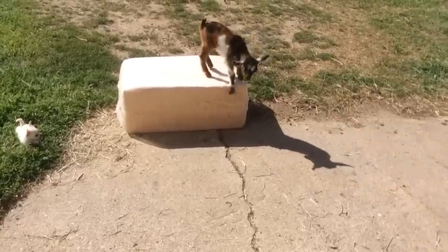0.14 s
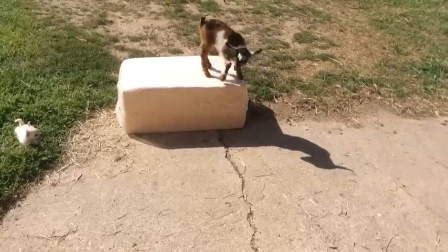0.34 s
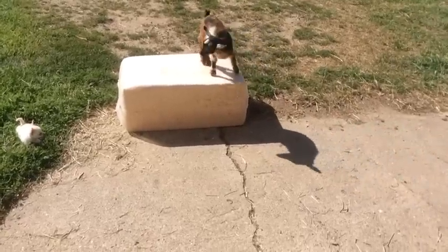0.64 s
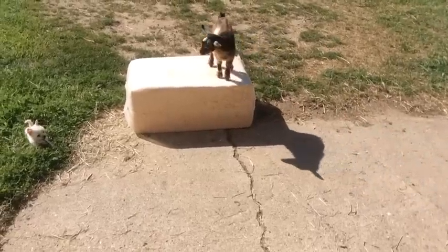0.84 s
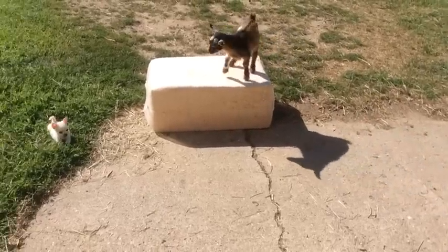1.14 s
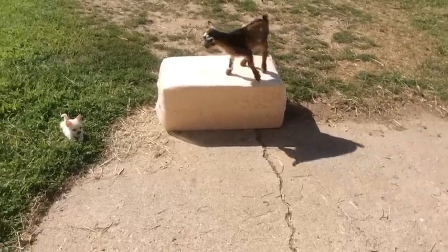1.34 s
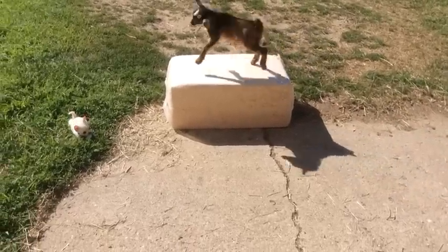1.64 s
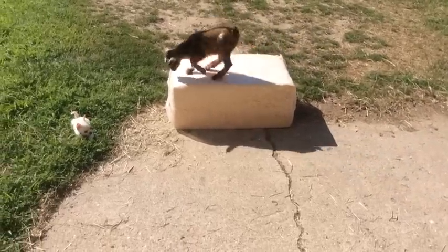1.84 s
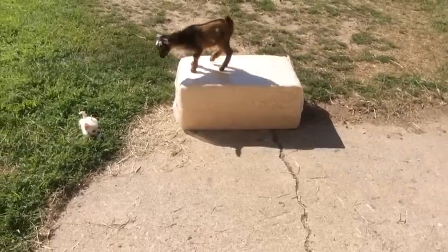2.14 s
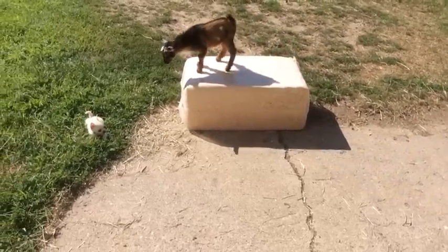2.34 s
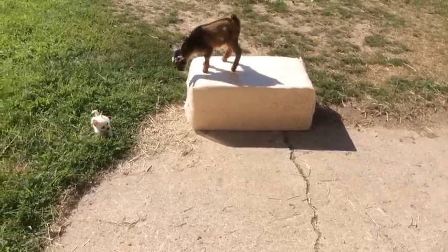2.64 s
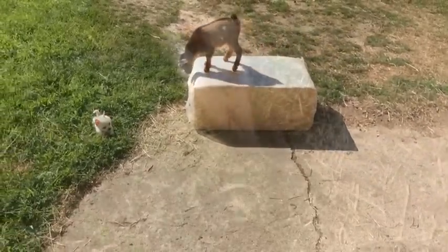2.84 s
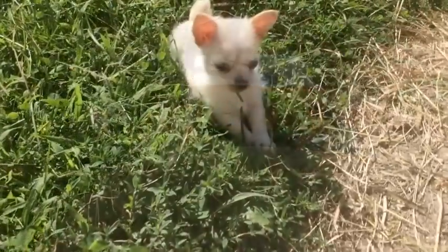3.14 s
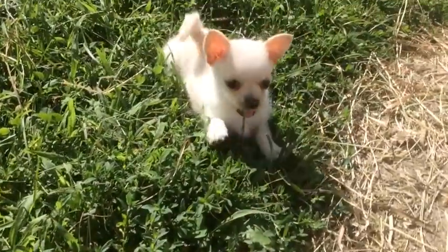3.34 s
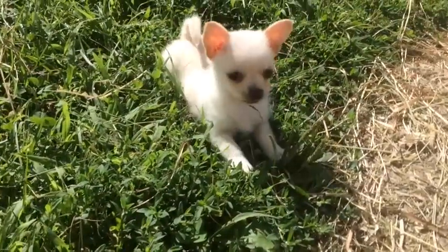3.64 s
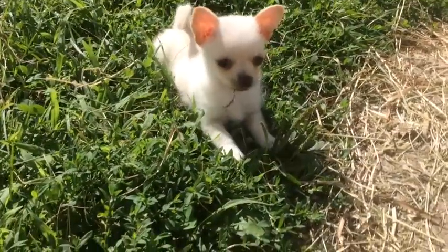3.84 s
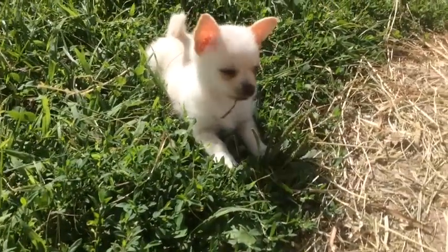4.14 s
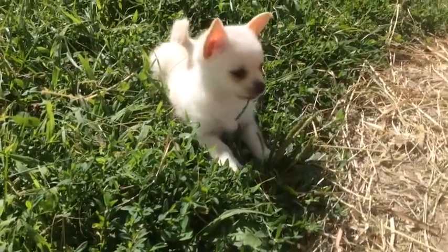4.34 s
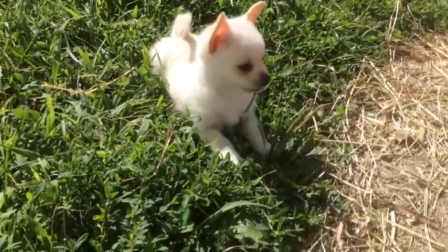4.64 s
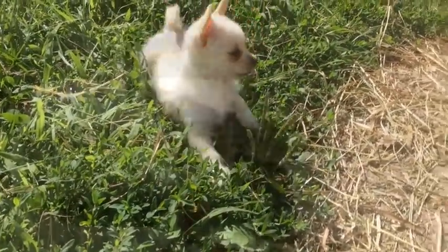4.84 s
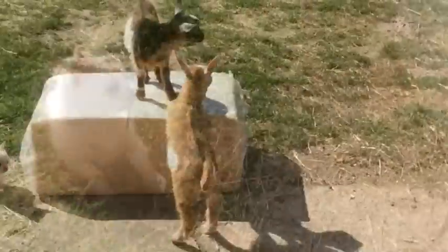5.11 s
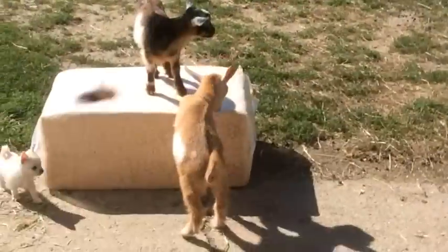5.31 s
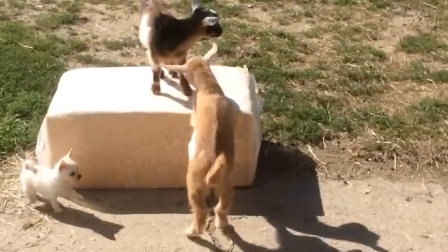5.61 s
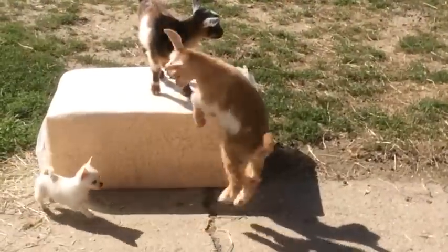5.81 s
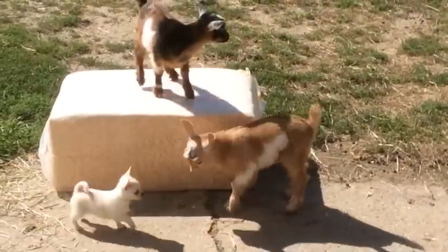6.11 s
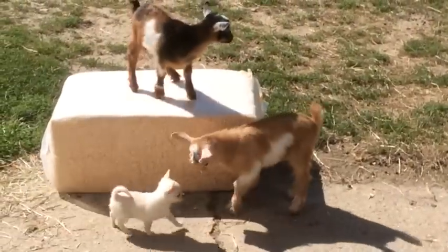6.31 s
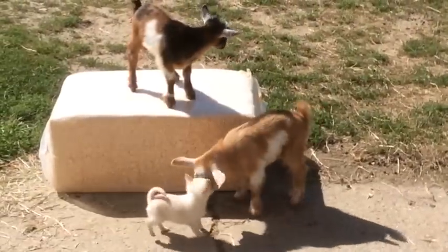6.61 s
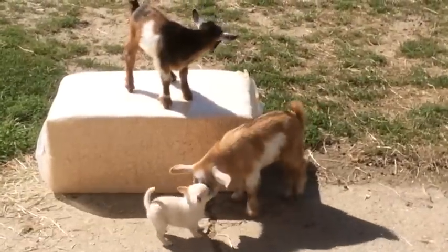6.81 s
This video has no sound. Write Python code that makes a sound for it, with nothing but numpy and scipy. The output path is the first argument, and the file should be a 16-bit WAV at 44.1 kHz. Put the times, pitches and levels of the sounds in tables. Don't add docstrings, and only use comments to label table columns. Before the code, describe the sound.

A small goat gives four stuttering, creaky bleats: a loud one at once, a softer one, a weak fading one, then a loud, falling one. Hooves tap and thud on a plastic-wrapped bale, with a crackly flurry before the last bleat. A far bird peeps early, a near insect chirps late. Open farmyard with breeze and insect hiss, phone microphone.

```python
import sys
import numpy as np
from scipy import signal
from scipy.fft import rfft, irfft, next_fast_len
from scipy.io import wavfile
from scipy.ndimage import uniform_filter1d, map_coordinates

SR = 44100
rng = np.random.default_rng(int(sys.argv[2]) if len(sys.argv) > 2 else 0)


def materialize(psi):
    bounded = np.clip(np.atleast_2d(psi).T, -1, 1)
    quanta = np.round(bounded * 32767).astype(np.int16)
    wavfile.write(sys.argv[1], SR, quanta)


def invert_db(x):
    u = np.asarray(x, float) / 20
    return 10 ** u


N = 307359

# (start [s], length [s], peak effort [dB], fold snaps [Hz], chest [dB])
BLEATS = [
    [(-0.0314, 0.054, -35.5, 216.2, -8), (.0728, 0.061, -32.5, 211.4, -10.5),
     (.1827, 0.052, -33, 203.8, -9), (.2987, .05, -34.5, 196, -7), (.4121, 0.026, -57.5, 197.5, 2.5)],
    [(1.9, 0.019, -45.5, 223.6, -2), (1.9728, 0.051, -38.5, 223.9, -13), (2.0684, 0.054, -40, 217.5, -8),
     (2.1808, 0.052, -40, 203.6, -7), (2.3167, 0.0417, -43.5, 173.7, -4)],
    [(3.4209, 0.038, -63.5, 200.6, 3.5), (3.5193, 0.041, -50.5, 223.7, 0), (3.6054, .06, -46.5, 215, -3),
     (3.7256, 0.0485, -48, 203.8, -4), (3.8302, 0.0551, -48.5, 192.4, 1.5), (3.9319, 0.097, -66.5, 198, 10)],
    [(5.373, 0.012, -46, 224.6, -15), (5.404, .008, -53, 222.5, -9), (5.4617, 0.037, -35, 229.4, -9.5),
     (5.5517, 0.0523, -35, 224.6, -7), (5.657, 0.054, -37.5, 221.1, -6), (5.7758, 0.046, -39.5, 202.8, 0),
     (5.9002, 0.046, -40.5, 186.8, -14), (6.035, 0.042, -68, 192.5, 1)],
]
# (pitch at first syllable [Hz], climb [Hz/s], overtone [dB],
# chest climb [Hz/s], throat climb [dB/s])
MOUTH = [(3743, 780, -9.5, -150, 3), (3466, 1600, -29, 0, 6), (3740, 840, -10, -74, 13),
         (3160, 1080, -22, 222, 16)]
# (chest [Hz], throat (pitch [Hz], level [dB]), nose (same), upper tract (same))
TRACT = [(873, (1840, -9), (2710, -13.5), (4800, -9)), (851, (1790, -15), (2620, -23), (4990, -8.5)),
         (860, (1650, -18.5), (2640, -2), (5200, 0.5)), (839, (1845, -8), (2200, -14), (7500, -40))]
# (upward glide [Hz], time shut [s], delay of the echo off the ground [s], level of that
# echo [dB])
FOLDS = [(230, 0.0067, 0.0023, -3), (200, 0.008, 0.001821, 4), (150, .0037, 0.0017, 5),
         (570, 0.0032, 0.00119, -14)]
# (breath [dB], low voice [dB], pitch sag [share], pitch scoop at start [share])
AIR = [(-19, -28.5, 0.04, -0.014), (-18.5, -23, 0.0033, -0.015), (-4.5, -12, .03, 0.0013),
       (-18, -17.5, .01, .04)]
# (mouth ring time for 60 dB [s], weak creak ahead of each syllable [s])
CREAK = [(.011, 0), (.012, 0), (.010, .025), (.017, 0)]
PEAK_AT = [0.87, 0.998, 0.552, 0.66]
RASP_DB = [-15, -12, -8, -18]
SNAP_DB = [-16.5, -20, -3.5, -24]
# (level [dB], pitch [Hz])
LEAK = [(-65, 4050), (-68, 4000), (-63, 4000), (-67, 3700)]

# (pitch [Hz], level [dB], time for 60 dB [s])
BALE = [(112.5, -4.5, 0.035), (170.7, 0.5, 0.061), (215, -0.5, 0.03)]
# (pitch [Hz], level [dB], time for 60 dB [s])
WRAP = [(420, -3, 0.024), (494, 3, 0.022), (750, -8, 0.028), (1220, -33.5, 0.0081)]
# (time [s], crackle peak [dB], crackle pitch [Hz], thud [dB], slap [dB])
STAMPS = [(1.8187, -47.5, 2600, -45.5, -45), (1.8995, -39, 6040, -36.5, -46.5),
          (1.9534, -46.5, 4420, -44.5, -56), (2.1553, -49, 3460, -47.5, -57),
          (4.7457, -34, 4240, -61.5, -34), (4.751, -29.5, 5500, -71, -34), (4.7602, -27, 4490, -48, -47),
          (4.813, -36, 3000, -39, -41.5), (4.822, -33, 4300, -42, -34), (4.8322, -28, 960, -39, -43),
          (5.0016, -36.5, 2130, -44.5, -38), (5.026, -31.5, 4100, -49.5, -37),
          (5.0908, -38.5, 2150, -42, -43)]
# (time [s], crackle peak [dB], crackle pitch [Hz], slap [dB])
TICKS = [(.6594, -43, 1148, -69), (1.3086, -57.5, 4840, -75.5), (1.9005, -26.5, 1160, -50),
         (4.6935, -62, 1110, -51.5), (4.777, -52, 3580, -59), (4.802, -56, 3000, -53),
         (4.8573, -46.5, 2610, -66.5), (4.882, -54, 2900, -79), (4.938, -47.5, 4700, -50),
         (4.97, -53, 3120, -53), (5.013, -41, 2530, -51), (5.085, -43.5, 3020, -49),
         (5.293, -45.5, 1990, -54), (5.35, -46, 3260, -54.5), (6.084, -54, 9800, -55)]
# (time [s], thud [dB], crackle peak [dB], crackle pitch [Hz])
SHIFTS = [(0.9606, -52, -51, 1220), (2.8983, -61, -69, 4470), (4.136, -54, -44, 1244),
          (4.248, -55.5, -56, 10600), (4.2785, -55, -48, 1060), (4.335, -61, -58.5, 11000),
          (3.983, -54.5, -64, 1000), (4.889, -58, -66, 2600), (5.047, -48, -60, 1000),
          (5.114, -52.5, -62, 2620), (5.163, -55.5, -81, 3150)]
# (time [s], length [s], level [dB])
SCUFF = [
    (6.29, 0.048, -60),
    (6.4, 0.05, -60.5),
]
# (time [s], length [s], level [dB])
RUSTLE = [
    (.64, .1, -65.5),
    (1.585, 0.09, -72),
    (1.825, 0.0222, -55),
    (4.39, 0.143, -70.5),
]

# (time [s], peak level [dB], pitch [Hz])
CHIRPS = [
    (5.3358, -68.5, 9060),
    (5.64, -68.5, 9200),
    (5.905, -63.5, 8970),
    (6.2238, -70, 8740),
    (6.5036, -68.5, 8772),
    (6.8201, -66.5, 8700),
]
# (time [s], peak level [dB], pitch [Hz])
PEEPS = [(0.5681, -60, 4810), (0.6115, -67, 4930), (1.3254, -56, 4720), (1.3636, -53, 4900),
         (1.6013, -55, 4800), (1.6417, -53.5, 4800), (2.4124, -54, 4740), (2.772, -56, 4800),
         (2.8125, -60, 4970), (2.8624, -59, 4730)]

# (pitch [Hz], time for 60 dB [s])
ECHO = [(200, 0.084), (1000, 0.17), (4000, 0.11), (12000, 0.19)]
# (pitch [Hz], level per Hz [dB])
RUMBLE = [(15, -55), (25, -19), (86, -1.5), (124, -3), (196, -4.5), (234, -5.5), (560, -15), (1200, -24),
          (1560, -84), (2640, -120)]
# (pitch [Hz], level per Hz [dB])
RUSH = [(290, -32), (500, -2.5), (617, -3), (888, -7), (981, -6), (1700, -7.5), (4760, -7), (7000, -17.5),
        (9100, -69), (15400, -120)]
# (pitch [Hz], level per Hz [dB])
INSECTS = [(3530, -85), (6000, -17), (6840, -13.5), (7870, -2), (8260, -1.5), (9740, -11), (12200, -12.5),
           (13300, -11), (14700, -12), (15700, -10), (16000, -41)]
# (from [s], rumble [dB], rush [dB], insects [dB])
STRETCHES = [
    (0, -66, -63.5, -69.5),
    (3.0, -66.5, -69, -72),
    (5.05, -69.5, -69, -70.5),
]
# (time [s], level [dB])
LIFT = [(0, 2), (.6, 1), (1.8, -.5), (2.1, 2.5), (2.9, -1.5), (3.4, 1.5), (3.73, 10), (4.05, 2),
        (4.74, 2.5), (5.0, 5), (5.3, 4.5), (5.67, 7), (6.19, 2), (6.97, 0.5)]


def unit(x):
    return x / np.sqrt(np.mean(x ** 2) + 1e-20)


def band(x, lo_hz, hi_hz):
    return signal.sosfilt(signal.butter(2, [lo_hz, hi_hz], "bandpass", fs=SR, output="sos"), x)


def ring(t, hz, t60, rise):
    return np.sin(2 * np.pi * hz * t) * invert_db(-60 * t / t60) * (1 - np.exp(-t / rise))


def add(track, s, x):
    track[round(s * SR):][:len(x)] += x


def wobble(rate):
    knots = rng.standard_normal(int(N * rate / SR) + 4)
    return map_coordinates(knots, [np.arange(N) * rate / SR])


def along(points, hz):
    f, v = np.transpose(points)
    return np.interp(np.log(hz + 1), np.log(f + 1), v)


def curves(rows):
    s, *cols = np.transpose(rows)
    return [np.interp(np.arange(N) / SR, s, c) for c in cols]


def noise(spectrum, patchy_db):
    z = signal.stft(rng.standard_normal(N + 512), nperseg=512)[2]
    patches = uniform_filter1d(rng.standard_normal(z.shape), 6, 0)
    patches = unit(uniform_filter1d(patches, 10, 1))
    x = signal.istft(z * invert_db(patchy_db * patches), nperseg=512)[1]
    size = next_fast_len(N)
    hz = np.fft.rfftfreq(size, 1 / SR)
    return unit(irfft(rfft(x, size) * invert_db(along(spectrum, hz)), size)[:N])


def strokes(rows, fade_s):
    t, rise_s = np.arange(N) / SR, 0.0324
    total = 0
    for s, length, db in rows:
        outside = np.maximum((s - t) / rise_s, (t - s - length) / fade_s)
        total = total + invert_db(db - 60 * np.maximum(outside, 0))
    return total


def syllable(u, peak_at, length, peak_db, pitch, chest_db, sag, scoop):
    early = max(1 - u / peak_at, 0) * min(length / .045, 1)
    late = max(u - peak_at, 0) / (1 - peak_at)
    db = peak_db - 17.5 * early ** 1.62 - 5.5 * late ** 2
    hz = pitch * (1 - sag * (u - .5) - scoop * early ** 3)
    narrow_hz = 890 * early ** 3.6 + 246 * late
    chest_db = chest_db - 35.5 * (u - 0.65) ** 2
    throat_db = -5 * early - 0.34 * (peak_db + 41.5)
    return db, hz, narrow_hz, chest_db, throat_db


def mouth_ring(t, mouth, detune, t60, overtone_db, folds):
    glide, shut, second_delay, second_db = folds
    rising = mouth * detune + glide * (t / 0.003494 - .5)
    sound = ring(t, rising, t60, 0.0001)
    sound -= invert_db(overtone_db) * ring(t, 2.2 * mouth, 0.0096, 0.0048)
    sound += invert_db(second_db) * ring(np.maximum(t - second_delay, 0), rising, 0.0037, 0.000192)
    return sound / (1 + (t / shut) ** 6)


def breath_puff(t, gust, hiss):
    puff = invert_db(-60 * t / .007) * gust
    puff += .8 * ring(t, 9700, .0025, .0001) + .5 * ring(t, 7600, .0025, .0001)
    return puff + 700 * t * invert_db(-60 * t / 0.0107) * hiss


def bleats():
    jitter, shimmer_db, detune = .006, 1.6, .006
    voice, grid = np.zeros(N + SR), np.arange(SR // 40) / SR
    settings = zip(BLEATS, PEAK_AT, MOUTH, TRACT, FOLDS, AIR, RASP_DB, SNAP_DB, CREAK)
    for rows, peak_at, jaw, tract, folds, flow, rasp_db, snap_db, (mouth_t60, creak) in settings:
        mouth_hz, mouth_climb, overtone_db, chest_climb, throat_climb = jaw
        chest_hz, (throat_hz, throat_db), (nose_hz, nose_db), (upper_hz, upper_db) = tract
        breath_db, low_db, sag, scoop = flow
        for start, length, peak_db, hz, fill_db in rows:
            since = start - rows[0][0]
            chest = chest_hz + chest_climb * since
            throat = throat_hz - 160 * since
            air = rng.standard_normal((21, len(grid)))
            puffs, hisses, rasps = band(air, 4810, 10600), band(air, 12900, 14320), band(air, 1640, 5160)
            now = start - creak
            for luck, gust, hiss, rasp in zip(rng.standard_normal((21, 5)), puffs, hisses, rasps):
                if now > start + length + .002:
                    break
                u = np.clip((now - start) / length, 0, 1)
                db, pitch, narrow_hz, chest_db, lag_db = syllable(
                    u, peak_at, length, peak_db, hz, fill_db, sag, scoop)
                db -= 120 * max(start - now, 0)
                t = np.maximum(grid - (now - round(now * SR) / SR), 0)
                mouth = mouth_hz + mouth_climb * since + narrow_hz
                pulse = mouth_ring(t, mouth, 1 + detune * luck[2], mouth_t60, overtone_db, folds)
                pulse -= invert_db(nose_db + luck[3]) * ring(t, nose_hz, .008, .0002)
                pulse += invert_db(upper_db + luck[4]) * ring(t, upper_hz, 0.008, 0.00063)
                throat_gain = invert_db(throat_db + lag_db + throat_climb * since - 0.5)
                pulse += throat_gain * ring(t, throat, 0.016, 0.00086)
                pulse += invert_db(snap_db) * ring(t, 2240, 0.0011, 0.0001)
                pulse += invert_db(rasp_db + 6 - 60 * t / .014) * rasp
                pulse -= invert_db(chest_db - 4.5) * ring(t, chest, 0.035, 0.0013)
                low = ring(t, 364, 0.012, 0.00083) + 0.53 * ring(t, 206, 0.0267, 0.0041)
                pulse += invert_db(low_db + 0.49 * (fill_db + 7.5)) * low
                pulse += invert_db(breath_db - 0.32 * (db + 37.5)) * breath_puff(t, gust, hiss)
                if now >= 0:
                    add(voice, now, invert_db(db + 10.0 + shimmer_db * luck[0]) * pulse)
                now += (1 + jitter * luck[1]) / pitch
    return voice[:N]


def leak():
    flow, width = 0, 0.11
    for rows, (db, hz) in zip(BLEATS, LEAK):
        air = unit(band(rng.standard_normal(N), hz * (1 - width), hz * (1 + width)))
        start, end = rows[1][0], rows[-1][0]
        flow = flow + strokes([(start, end - start, db)], 0.51) * invert_db(2.7 * wobble(30)) * air
    return flow


def contacts():
    rows = list(STAMPS)
    rows += [(s, db, hz, slap - 9, slap) for s, db, hz, slap in TICKS]
    rows += [(s, db, hz, thud, thud - 7.5) for s, thud, db, hz in SHIFTS]
    return [(*row, row[1] - 10.5 + 4.5 * np.log2(row[2] / 3000)) for row in rows]


def hooves():
    knocks, t, lead = np.zeros(N + SR), np.arange(SR // 8) / SR, .012
    for s, crackle_db, crackle_hz, thud_db, slap_db, sheen_db in contacts():
        luck = rng.standard_normal((3, len(t)))
        thud, slap = 0, 0
        for (hz, db, t60), k in zip(BALE, luck[0]):
            thud = thud + invert_db(db + 2 * k) * ring(t, hz * (1 + 0.13 * k), t60, 0.0043)
        for (hz, db, t60), k in zip(WRAP, luck[0, 9:]):
            slap = slap + invert_db(db + 3 * k) * ring(t, hz * (1 + .08 * k), t60, .0008)
        slap += 0.64 * invert_db(-60 * t / 0.072) * unit(band(luck[1], 290, 710))
        add(knocks, s, invert_db(thud_db + 8.5) * thud + invert_db(slap_db - 2) * slap)

        swell = invert_db(-60 * np.maximum((t - lead) / .011, (lead - t) / .008))
        swell += invert_db(-14.5 - 60 * np.maximum((t - lead) / 0.083, (lead - t) / 0.028))
        spiky = luck[1] * invert_db(6.7 * luck[2]) * swell
        film = band(spiky, 0.64 * crackle_hz, 1.24 * crackle_hz) + invert_db(-10.0) * band(spiky, 1200, 6700)
        sheen = band(spiky, 4370, 11500)
        add(knocks, s + 0.00055 - lead, invert_db(crackle_db) * film + invert_db(sheen_db) * sheen)
    return knocks[:N]


def friction():
    grit = noise([(150, -8.5), (450, 0.5), (1100, -4.5), (2500, -27), (8000, -53)], patchy_db=0.5)
    scrape = strokes(SCUFF, .4) * unit(invert_db(0.72 * wobble(60)) * grit)
    leaves = noise([(2000, -23), (6000, -8), (11000, -8), (15000, -9)], patchy_db=-2)
    return scrape + strokes(RUSTLE, 0.083) * unit(invert_db(wobble(130)) * leaves)


def chirps():
    song, t = np.zeros(N + SR), np.arange(SR // 14) / SR
    hump = np.sin(np.pi * t / t[-1])
    for s, db, hz in CHIRPS:
        train = hump * np.abs(np.sin(np.pi * 30 * t))
        wing = unit(band(rng.standard_normal(len(t)), hz - 90, hz + 90))
        add(song, s - .012, invert_db(db + 5) * train * wing)
        for before in (3, 2, 1):
            low = hz - 330 * before
            scrape = unit(band(rng.standard_normal(len(t)), low - 150, low + 150))
            add(song, s - .06 * before, invert_db(db - 17) * hump * scrape)
    return song[:N]


def bird():
    song, t = np.zeros(N + SR), np.arange(SR // 50) / SR
    for s, db, hz in PEEPS:
        phase = 2 * np.pi * np.cumsum(hz * (1.025 - 2.37 * t)) / SR
        add(song, s, invert_db(db - 8.5) * np.sin(np.pi * t / t[-1]) * np.sin(phase))
    return song[:N]


def echo(x):
    hz, t, z = signal.stft(rng.standard_normal(SR // 3), SR, nperseg=256)
    tail = signal.istft(z * invert_db(-60 * t / along(ECHO, hz)[:, None]), SR, nperseg=256)[1]
    delayed = np.pad(x, (300, 0))
    return signal.fftconvolve(delayed, tail / np.linalg.norm(tail))[:N]


def yard():
    half_slide_s = 0.19 / 2
    ends = [stretch[0] for stretch in STRETCHES[1:]] + [N / SR]
    held = []
    for (s, *dbs), end in zip(STRETCHES, ends):
        held += [(s + half_slide_s, *dbs), (end - half_slide_s, *dbs)]
    rumble_db, rush_db, insect_db = curves(held)
    lift_db, = curves(LIFT)
    rumble = unit(invert_db(1.5 * wobble(9)) * noise(RUMBLE, patchy_db=1.5))
    rumble = invert_db(rumble_db + 0.34 * lift_db + 1) * rumble
    rush = invert_db(rush_db + 1.02 * lift_db + 0.23 * wobble(2.8)) * noise(RUSH, patchy_db=2.0)
    insect_db = insect_db + 0.51 * lift_db + 0.5 + 0.21 * wobble(5.85)
    return rumble + rush + invert_db(insect_db) * noise(INSECTS, patchy_db=1.2)


def scene():
    kid = bleats() + leak()
    feet = hooves()
    answer = echo(invert_db(-11.5) * kid + invert_db(-14) * feet)
    return (kid + feet + answer + friction() + chirps() + bird() + yard())[None]


def band_limit(x):
    return signal.sosfilt(signal.butter(12, 16290, fs=SR, output="sos"), x)


def record(dry):
    size, top_hz = next_fast_len(N), 15340
    hz = np.fft.rfftfreq(size, 1 / SR)
    gain = np.where(hz < top_hz, 1, invert_db(-28 - np.abs(hz - top_hz) / 40))
    limited = irfft(rfft(dry, size) * gain, size)[:, :N]
    return band_limit(limited)


dry = scene()
out = record(dry)
materialize(out)
```